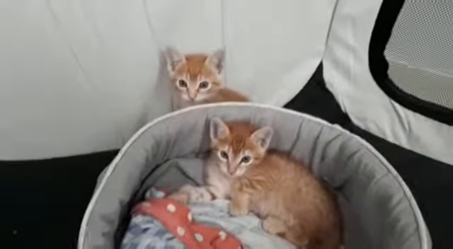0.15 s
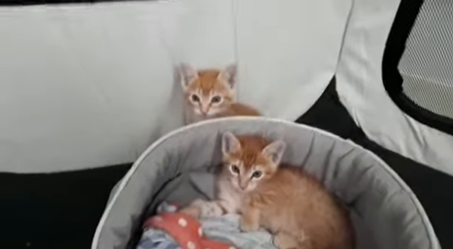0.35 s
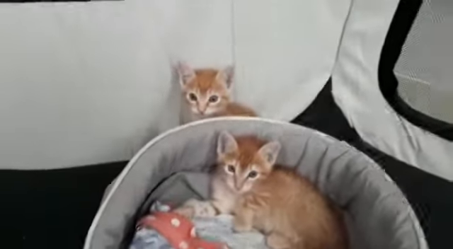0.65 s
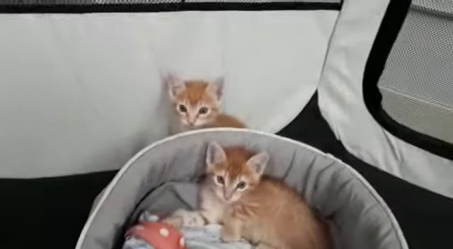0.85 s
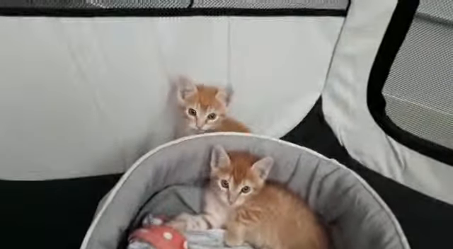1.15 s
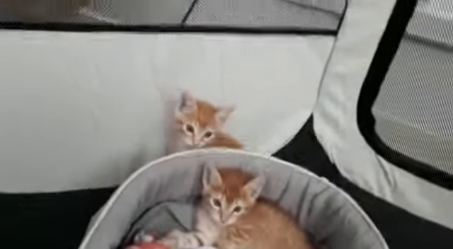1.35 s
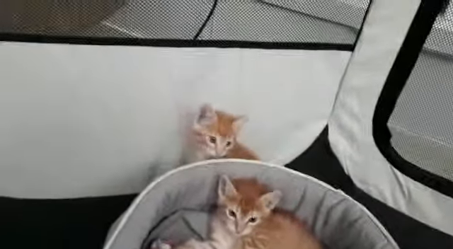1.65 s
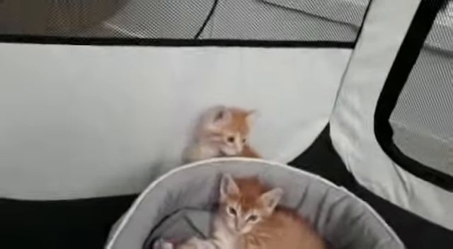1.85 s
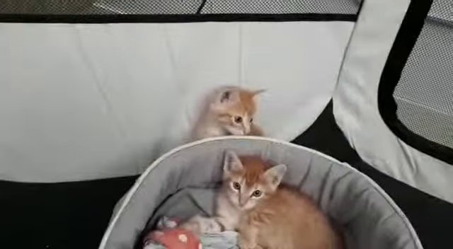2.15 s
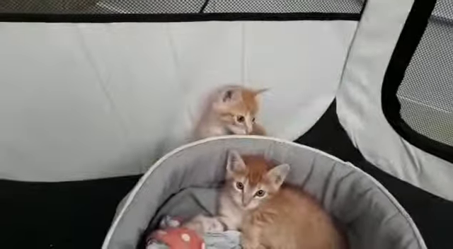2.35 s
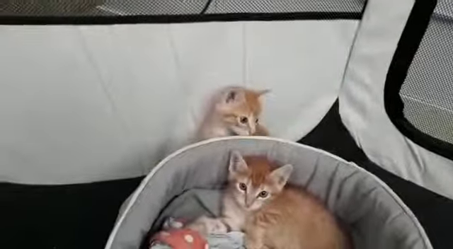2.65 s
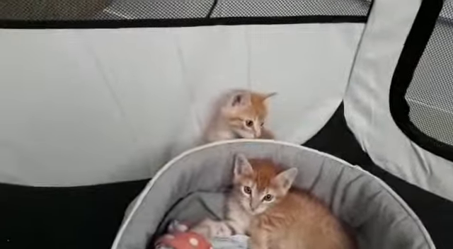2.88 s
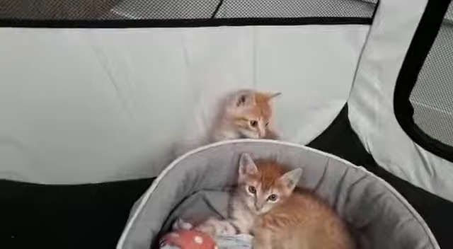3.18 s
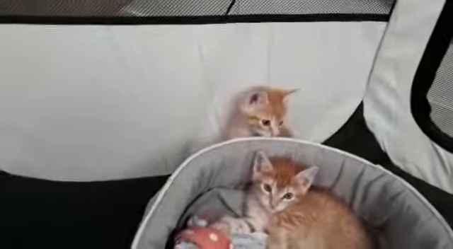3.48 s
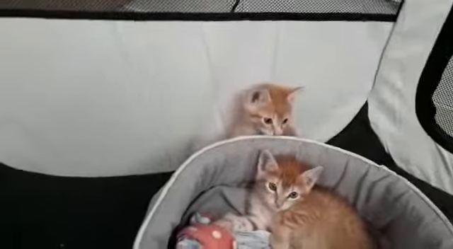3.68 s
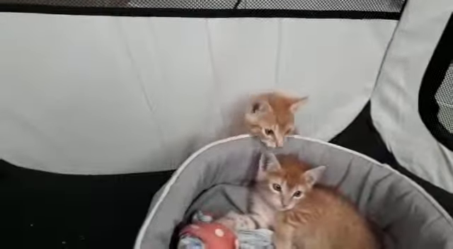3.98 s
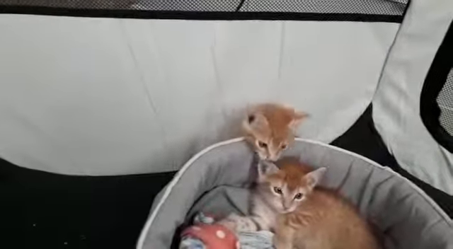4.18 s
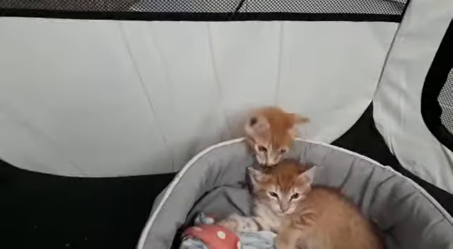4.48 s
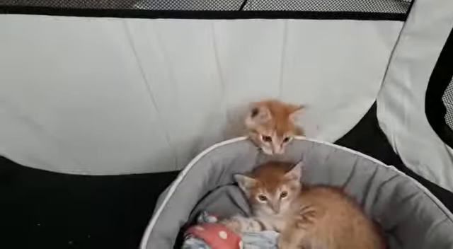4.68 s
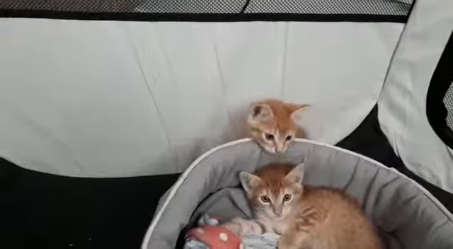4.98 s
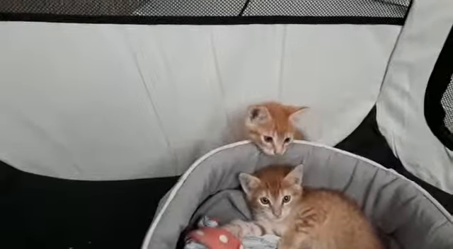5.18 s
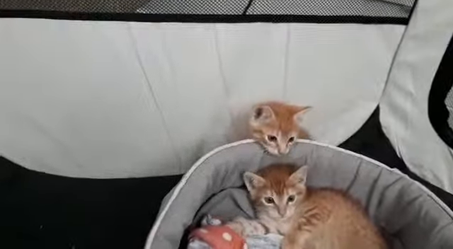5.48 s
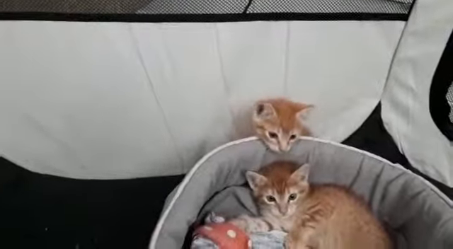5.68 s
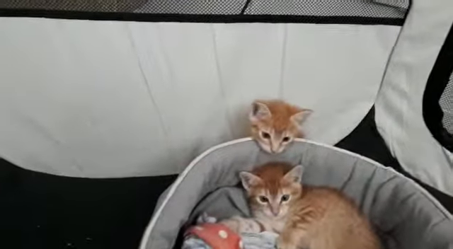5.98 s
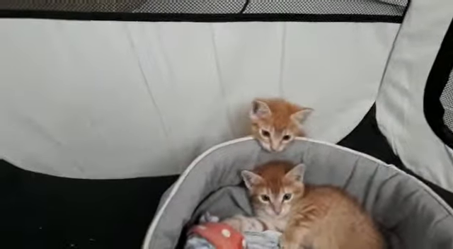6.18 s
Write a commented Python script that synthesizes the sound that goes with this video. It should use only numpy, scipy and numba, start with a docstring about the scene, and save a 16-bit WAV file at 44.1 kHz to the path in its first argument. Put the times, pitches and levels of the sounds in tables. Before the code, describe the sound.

After some microphone bumps, a little pellet bell is shaken in two bright, rattling spells over a faint room hum.

```python
"""A quiet room, where a hand shakes a small pellet bell toy near a hand-held stereo microphone.
The pellet hits, bounces and rolls in the shell; thin metal modes ring on over a short hard rattle.
Fingers knock and rub on the microphone body, and the grip shifts with a low rumble.
Faint clinks come from far off before the shaking starts, and the room hums throughout."""
import sys
import numpy as np
from scipy import signal
from scipy.fft import rfft, irfft
from scipy.io import wavfile
from scipy.ndimage import map_coordinates
from numba import njit

SR = 44100
rng = np.random.default_rng(int(sys.argv[2]) if len(sys.argv) > 2 else 0)


def pcm_store(signal):
    """Save signal as 16-bit PCM."""
    levels = np.round(np.clip(np.atleast_2d(signal), -1, 1) * 32767)
    wavfile.write(sys.argv[1], SR, levels.astype(np.int16).T)


N = 279141
BIN_HZ = np.maximum(np.fft.rfftfreq(N, 1 / SR), 1)

# The pellet hits the wall. Each row: start in seconds, relative strength in dB.
PELLET_HITS = [(1.4457, -47), (1.5039, -38.5), (1.5506, -33.5), (1.575, -34.5), (1.6085, -36.5),
               (1.642, -33.5), (1.7225, -21), (1.7625, -18), (1.8433, -12), (1.8866, -21.5),
               (1.9566, -23.5), (1.999, -18.5), (2.0513, -23), (2.1079, -24), (2.1265, -20),
               (2.1796, -23.5), (2.236, -23), (2.25, -22), (2.3082, -19), (2.3215, -21), (2.356, -26),
               (2.368, -23), (2.418, -25), (2.458, -22.5), (2.5318, -21), (2.5698, -22), (2.6377, -27),
               (2.66, -18), (2.6943, -19), (2.7544, -18.5), (2.7812, -24), (2.8001, -17), (2.872, -21),
               (2.9309, -20), (3.0062, -17), (3.0411, -18.5), (3.058, -23), (3.1894, -25.5), (3.226, -35.5),
               (3.2666, -28.5), (3.298, -33), (3.3768, -35), (3.4218, -34), (3.509, -40.5), (3.6104, -38.5),
               (3.795, -52), (3.8922, -44.5), (3.9516, -41.5), (3.984, -39.5), (4.0515, -46), (4.1312, -26),
               (4.1995, -26), (4.2086, -26), (4.2857, -29.5), (4.3281, -28), (4.4135, -36), (4.4369, -21.5),
               (4.4973, -23.5), (4.5349, -24.5), (4.546, -19.5), (4.613, -20), (4.6538, -17), (4.6674, -18),
               (4.7392, -22), (4.7782, -23), (4.7962, -20.5), (4.856, -31), (4.8955, -19.5), (4.924, -24.5),
               (4.9673, -26.5), (5.0021, -22), (5.0874, -26), (5.1128, -24), (5.1374, -23.5),
               (5.2022, -24.5), (5.2584, -26), (5.3484, -28), (5.3965, -26), (5.4194, -25.5), (5.4728, -31),
               (5.5184, -23), (5.557, -23.5), (5.6377, -35), (5.666, -23), (5.7236, -18), (5.7384, -23.5),
               (5.7672, -26), (5.779, -18.5), (5.8213, -23.5), (5.8377, -20), (5.8717, -27),
               (5.8856, -20.5), (5.9425, -27), (5.9583, -24), (5.9877, -17.5), (6.0036, -16.5),
               (6.0618, -18), (6.093, -22), (6.1041, -20), (6.1411, -20), (6.1825, -23), (6.2079, -19),
               (6.2294, -16.5), (6.2703, -23), (6.2946, -19.5)]
# The shaking hand keeps the pellet rolling. Each row: time in seconds, relative strength in dB.
ROLL_CURVE = [(1.36, -62.5), (1.62, -55), (1.93, -32.5), (2.83, -35.5), (3.15, -45), (3.84, -58),
              (4.53, -41), (5.1, -29.5), (5.5, -40), (5.9, -29.5), (6.33, -48)]
# The bell's metal modes. Each entry: pitch in Hz.
BELL_MODE_HZ = [1728, 2150, 2285, 3090, 3375, 3750, 3918, 4255, 4518, 4834, 4935, 5232, 5765, 6690, 6918,
                7300, 7659, 8474, 10042, 10150, 11685, 11725]
# The same modes, in order. Each row: relative level in dB, time to fade 60 dB (t60) in seconds.
BELL_MODES = [(-10.5, 0.052), (-18.5, 0.091), (-11, 0.064), (-16.5, 0.094), (-9, 0.066), (-13, 0.095),
              (-6, 0.053), (-11.5, 0.038), (-4, 0.048), (-3, 0.15), (-9.5, 0.13), (-15.5, 0.057), (0, 0.28),
              (-13, .05), (-3.5, 0.043), (-11.5, 0.039), (-3, 0.036), (1, 0.025), (-6, 0.21), (-10.5, 0.15),
              (0.5, 0.14), (-6, 0.13)]
# The tone of the shell's rattle. Each row: frequency in Hz, relative level in dB.
SHELL_COLOUR = [(1400, -29.5), (2000, -22), (2700, -24.5), (3600, -11), (5000, -12), (7500, -1.5),
                (9300, -10), (12000, -0.5), (13800, -3.5), (15600, -3.5)]
# Where the toy sits. Each row: time in seconds, lag of the left port in ms, pan in dB.
# Pan is always left level minus right level.
TOY_POSITION = [(1.4, .4, 1), (3.0, .4, 1.5), (3.6, .2, -2), (4.5, .2, 1.5), (5.3, .2, 1.5), (5.7, .05, 6),
                (6.3, .02, 5.5)]
# The microphone body shadows the toy. Each row: frequency in Hz, pan in dB.
MIC_SHADOW = [(1300, 4), (2400, 1.5), (4400, 3.5), (8100, 0.5), (15000, -6.5)]
# Fingers knock on the microphone. Each row: start in seconds, thud peak in dB, pitch in Hz,
# pan in dB, tick peak against the thud in dB.
FINGER_KNOCKS = [(0.15, -45, 385, 20, -14), (0.268, -33, 720, 26, -4), (0.289, -34.5, 410, 13, -2),
                 (0.312, -31, 780, 10, 7.5), (0.431, -43.5, 716, 14, 11.5), (0.445, -26.5, 642, 16, 2.5),
                 (2.356, -35.5, 768.4, -25, -2), (2.467, -39, 440.5, -36, -1), (2.569, -43, 127, -7, -6),
                 (2.643, -40, 191.3, -4.0, 0), (2.813, -36, 409.2, -33, -6), (3.066, -44.5, 469.9, -27, -6),
                 (5.262, -43.5, 146.8, 17, 3), (5.394, -39.5, 167.2, 9, 4.5), (5.484, -35.5, 117.1, 17, 2),
                 (5.954, -37.5, 552.2, 21, -3), (5.976, -33.5, 217.8, 20, -18), (5.996, -37, 128.1, 26, 11),
                 (6.064, -40, 145.8, 24, -8), (6.108, -39, 146.6, 22.5, 2)]
# Skin slides on the microphone. Each row: start in seconds, hold in seconds, level in dB,
# t60 in seconds, pan in dB.
RUB_STROKES = [(0, 0.061, -44, 0.16, 38), (0.147, 0.021, -57, 0.082, 18), (.21, 0.084, -60.5, 2.3, 4.5)]
# The grip shifts in swells. Each row: middle in seconds, half length in seconds, rumble in dB,
# scuff in dB, pan in dB.
GRIP_SWELLS = [(0.27, 0.37, -61.5, -58, 4.5), (1.851, .3, -69, -67.5, -4), (2.6, 0.91, -70, -62, -6.5),
               (4.945, 0.57, -56, -60, -0.5), (5.405, .2, -66, -63, 5), (6.051, 0.46, -63.5, -55, 10)]
# Bright rub, deep rumble and dull scuff. Each row: frequency in Hz, relative noise density in dB.
SKIN_RUB_COLOUR = [(120, -50), (200, -26), (883, -13), (1680, 1), (2470, -6), (2800, -3), (4040, -8.5),
                   (9580, -25.5), (16000, -26)]
GRIP_RUMBLE_COLOUR = [(20, -32), (60, -4), (120, -1), (200, -4), (400, -25), (3000, -82)]
GRIP_SCUFF_COLOUR = [(100, -34), (300, -3.5), (550, -3.5), (900, -6), (1500, -9), (4000, -67)]
# Far clinks. Each row: start in seconds, pitch in Hz, bandwidth in Hz, level in dB, t60 in seconds.
FAR_CLINKS = [(0.651, 4530, 90, -63, 0.55), (.65, 4520, 1111, -64, 0.27), (.655, 11000, 300, -69, 0.31),
              (.75, 2270, 100, -63.5, 0.22), (0.777, 4400, 80, -70, 0.28), (.79, 7400, 833.3, -60.5, 0.15),
              (0.939, 2100, 650, -66, 0.84), (1.085, 1870, 2700, -60.5, 0.63),
              (1.091, 980, 138.4, -66, 0.29), (1.124, 2995, 60, -63.5, 0.72),
              (1.201, 2920, 60, -72.5, 0.19)]
# The room's hum and hiss. Each row: frequency in Hz, relative noise density in dB.
ROOM_COLOUR = [(20, 6.5), (50, -3.5), (105, 5.5), (140, 2.5), (200, -9.5), (480, -9), (900, -13),
               (1600, -17), (3000, -23), (4400, -14), (5700, -26), (7300, -15.5), (8800, -27.5),
               (16000, -26.5)]
# The room tone's stereo image. Each row: frequency in Hz, left-right likeness from 0 (wide) to 1 (mono).
ROOM_LIKENESS = [(60, 0.97), (240, 0.79), (950, 0.27), (3770, 0), (15000, 0.034)]


def toy(reverb_db=-13, reverb_t60=0.18, low_cut_hz=1450):
    """Bell and rattle reach the two ports with a lag and a room tail; so small a body radiates no bass."""
    touches = pellet()
    lag_ms, pan_db = in_time(TOY_POSITION)
    left, right = bell(touches) + shell(touches)
    lagged_left = map_coordinates(left, [np.arange(N) - lag_ms * SR / 1000], order=3)
    direct = np.array([lagged_left, right])
    wet = direct + amp(reverb_db) * room_tail(direct, reverb_t60)
    thin = signal.sosfilt(signal.butter(6, low_cut_hz, "high", fs=SR, output="sos"), wet)
    shadowed = irfft(panned(rfft(thin), at_hz(MIC_SHADOW, BIN_HZ)), N)
    return panned(shadowed, pan_db)


def pellet(bounces_per_s=1500, bounce_db=-9, rolls_per_s=550, roll_db=-8, flight_db=-5, spread_db=4):
    """The pellet hits, bounces and rolls. Gives each touch's sample, strength, hit number and contact."""
    hit_s, hit_db = np.transpose(PELLET_HITS)
    hits, samples = np.round(hit_s * SR).astype(int), np.arange(N)
    last_hit = np.maximum(np.searchsorted(hits, samples, "right") - 1, 0)
    # It bounces longer in a long swing and shorter after a hard hit.
    swing_s = np.minimum(np.diff(hit_s, append=N / SR), .06)
    hardness_db = (hit_db - np.median(hit_db)).clip(0)
    bounce_s = np.maximum(.009 + .2 * swing_s - .0003 * hardness_db, .002)
    contact = np.exp(-np.abs(samples - hits[last_hit]) / SR / bounce_s[last_hit])
    touched = rng.random(N) < (rolls_per_s + bounces_per_s * contact) / SR
    touched[hits] = True
    touched[:hits[0]] = False
    # It leaves the wall late in the swing, so the rolling ducks before the next hit.
    to_next_s = (np.append(hits, N + SR)[last_hit + 1] - samples) / SR
    flight = np.clip(1 - to_next_s / (.3 * swing_s[last_hit]), 0, 1)
    rolling = amp(in_time(ROLL_CURVE)[0] + roll_db + flight_db * flight + 3 * drift(15))
    bouncing = amp(hit_db[last_hit] + bounce_db) * contact
    accents = amp(spread_db * np.minimum(rng.exponential(1, N), 2))
    strength = (bouncing + rolling) * accents
    strength[hits] = amp(hit_db)
    at = np.flatnonzero(touched)
    return at, strength[at], last_hit[at], contact[at]


def bell(touches, level_db=-25, blow_power=0.82):
    """Thin metal modes ring on between touches; hard blows feed them less than in proportion."""
    at, strength, last_hit, contact = touches
    mode_db, t60 = np.transpose(BELL_MODES)
    softened = (at, strength ** blow_power, last_hit, contact)
    return toy_modes(softened, np.array(BELL_MODE_HZ, float), mode_db + level_db, t60,
                     damping=.3, turn_db=2, port_db=3, alike=0.3, max_boost_db=4.5)


def shell(touches, level_db=-16, mode_count=48, ring_cycles=60):
    """Many short, closely spaced modes make a broad crisp tick with its own colour at each hit."""
    hz = np.linspace(np.sqrt(1500), np.sqrt(16000), mode_count) ** 2
    return toy_modes(touches, hz, at_hz(SHELL_COLOUR, hz) + level_db, ring_cycles / hz,
                     damping=0, turn_db=3.5, port_db=1.5, alike=0.34, max_boost_db=13)


def toy_modes(touches, hz, gain_db, t60, damping, turn_db, port_db, alike, max_boost_db):
    """The toy turns between hits: each mode is struck anew and radiates differently to the two ports."""
    at, strength, last_hit, contact = touches
    per_hit = (len(PELLET_HITS), len(hz))
    turned_db = turn_db * rng.standard_normal(per_hit) + port_db * rng.standard_normal((2, *per_hit))
    turned_db = turned_db.clip(None, max_boost_db)[:, last_hit]
    shared, left, right = rng.standard_normal((3, len(at), len(hz)))
    step = amp(-60 / (t60 * SR)) * np.exp(2j * np.pi * hz / SR)
    # A touch damps a mode only where the wall moves, and also upsets the phase of its ring.
    reach = 0.059 + rng.random(per_hit)[last_hit] ** 2
    jolt = np.exp(2j * damping * (contact[:, None] + 0.03) * rng.standard_normal(reach.shape))
    kept = (1 - damping * reach * contact[:, None]) * jolt
    channels = []
    for db, own in zip(turned_db, (left, right)):
        coupling = np.sqrt(alike) * shared + np.sqrt(1 - alike) * own
        blows = strength[:, None] * amp(gain_db + db) * coupling
        channels.append(struck_modes(at, blows, kept, step))
    return np.array(channels)


@njit
def struck_modes(at, blows, kept, step):
    """Each mode is a fading sine; a touch keeps a share of what rings and adds its own blow."""
    out = np.zeros(N)
    for mode in range(len(step)):
        state, touch = 0j, 0
        for i in range(at[0], N):
            state *= step[mode]
            if touch < len(at) and i == at[touch]:
                state = state * kept[touch, mode] + blows[touch, mode]
                touch += 1
            out[i] += state.imag
    return out


def finger_knocks(ring_cycles=4.34, rise_s=0.0013, tick_hz=1500, tick_t60=0.0051):
    """Each knock rings the microphone body for a few cycles, with a short broad tick on top."""
    out, t = np.zeros((2, N)), np.arange(SR // 10) / SR
    tick_pole = np.exp(-2 * np.pi * tick_hz / SR)
    for start_s, db, hz, pan_db, tick_db in FINGER_KNOCKS:
        attack = np.minimum(t / rise_s, 1) ** 2
        thud = np.sin(2 * np.pi * hz * t) * amp(-60 * t * hz / ring_cycles) * attack
        burst = signal.lfilter([1], [1, -.35], rng.standard_normal(len(t)) * amp(-60 * t / tick_t60))
        tick = signal.lfilter([1, -.85], [1, -tick_pole], burst) + .97 * ring(burst, hz=2479, t60=.0013)
        knock = thud / abs(thud).max() + amp(tick_db) * tick / abs(tick).max()
        i = round(start_s * SR)
        out[:, i:i + len(t)] += panned(amp(db) * knock, pan_db)[:, :N - i]
    return out


def handling(rub_attack_s=.012):
    """Skin slides on the microphone in grainy strokes; the shifting grip swells into rumble and scuff."""
    out, t = np.zeros((2, N)), np.arange(N) / SR
    rub = skin_noise(SKIN_RUB_COLOUR, flutter_db=2.5, flutter_hz=420)
    rumble = skin_noise(GRIP_RUMBLE_COLOUR, flutter_db=4, flutter_hz=8.5)
    scuff = skin_noise(GRIP_SCUFF_COLOUR, flutter_db=4.5, flutter_hz=14)
    for start_s, hold_s, db, t60, pan_db in RUB_STROKES:
        attack = np.clip((t - start_s) / rub_attack_s + 1, 0, 1)
        level = amp(db - 60 * (t - start_s - hold_s).clip(0) / t60)
        out += panned(attack * level * rub, pan_db)
    for middle_s, half_s, rumble_db, scuff_db, pan_db in GRIP_SWELLS:
        swell = np.cos(np.pi / 2 * np.clip((t - middle_s) / half_s, -1, 1)) ** 2
        out += panned(swell * (amp(rumble_db) * rumble + amp(scuff_db) * scuff), pan_db)
    return out


def skin_noise(colour, flutter_db, flutter_hz):
    """Uneven friction reaches each port through the body, so each channel has its own noise."""
    return coloured(rng.standard_normal((2, N)), colour) * amp(flutter_db * drift(flutter_hz))


def far_clinks(attack_s=0.016):
    """Clinks blurred by distance: dying noise in a resonance."""
    out, t = np.zeros((2, N)), np.arange(SR // 2) / SR
    for start_s, hz, width_hz, db, t60 in FAR_CLINKS:
        resonance_t60 = np.log(1000) / (np.pi * width_hz)
        tone = rms_one(ring(rng.standard_normal((2, len(t))), hz, resonance_t60))
        i = round(start_s * SR)
        out[:, i:i + len(t)] += amp(db - 60 * t / t60) * np.minimum(t / attack_s, 1) * tone
    return out


def room_tail(x, t60, predelay_s=.002):
    """Dense reflections off the walls, unrelated in the two channels."""
    t = np.arange(SR // 2) / SR
    tail = rng.standard_normal((2, len(t))) * amp(-60 * t / t60) * (t > predelay_s)
    tail /= np.sqrt((tail ** 2).sum(axis=1, keepdims=True))
    return signal.fftconvolve(x, tail, axes=1)[:, :N]


def room_tone(level_db=-64):
    """A steady bed of hum and hiss, centred in the bass and wide in the treble."""
    mid, side = rfft(rng.standard_normal((2, N)))
    alike = at_hz(ROOM_LIKENESS, BIN_HZ)
    pair = np.sqrt(1 + alike) * mid + np.sqrt(1 - alike) * side * [[1], [-1]]
    return amp(level_db) * coloured(irfft(pair, N), ROOM_COLOUR)


def amp(db):
    """Gain of a level in dB."""
    return 10 ** (np.asarray(db) / 20)


def rms_one(x):
    """Scaled to rms 1."""
    return x / np.sqrt(np.mean(x ** 2) + 1e-20)


def in_time(rows):
    """A table's columns as automation curves, one value a sample."""
    times_s, *columns = np.transpose(rows)
    return [np.interp(np.arange(N) / SR, times_s, column) for column in columns]


def at_hz(points, hz):
    """A spectrum table read on a log-frequency axis."""
    point_hz, values = np.transpose(points)
    return np.interp(np.log(hz), np.log(point_hz), values)


def panned(x, pan_db):
    """Left stands pan_db above right; the two gains always sum to 2."""
    left = amp(pan_db / 2)
    return x * np.array([left, 1 / left]).reshape(2, -1) * 2 / (left + 1 / left)


def drift(rate_hz):
    """A random wobble that glides through two points a cycle, each of spread 1."""
    knots = rng.standard_normal(4000)
    return np.interp(np.arange(N) / SR * rate_hz * 2, np.arange(len(knots)), knots)


def ring(x, hz, t60):
    """A resonator: a unit click sets a sine of height 1 ringing."""
    decay, angle = amp(-60 / (t60 * SR)), 2 * np.pi * hz / SR
    return signal.lfilter([0, np.sin(angle)], [1, -2 * decay * np.cos(angle), decay ** 2], x + 1e-18)


def coloured(x, spectrum):
    """x shaped by a spectrum, at rms 1."""
    return rms_one(irfft(rfft(x) * amp(at_hz(spectrum, BIN_HZ)), N))


def scene():
    """The toy up front, the fingers on the microphone, the room behind."""
    return toy() + finger_knocks() + handling() + far_clinks() + room_tone()


def record(dry):
    """The microphone loses the bass below 45 Hz; the top is cut steeply at 15750 Hz."""
    low_cut = signal.butter(2, 45, "high", fs=SR, output="sos")
    high_cut = signal.ellip(12, .5, 80, 15750, fs=SR, output="sos")
    return signal.sosfilt(high_cut, signal.sosfilt(low_cut, dry))


dry = scene()
out = record(dry)
pcm_store(out)
```